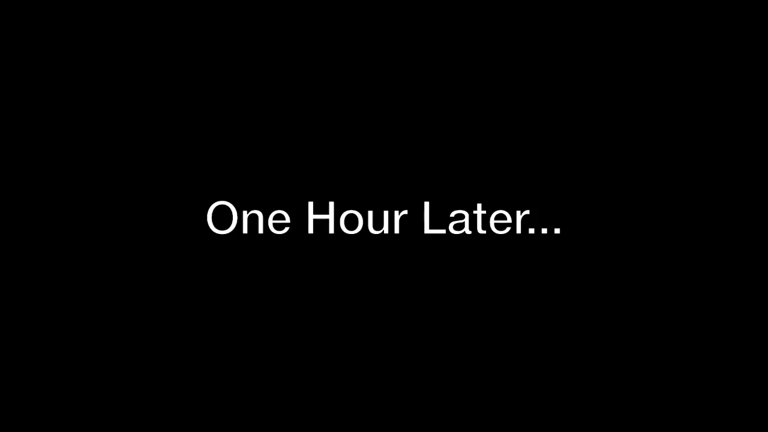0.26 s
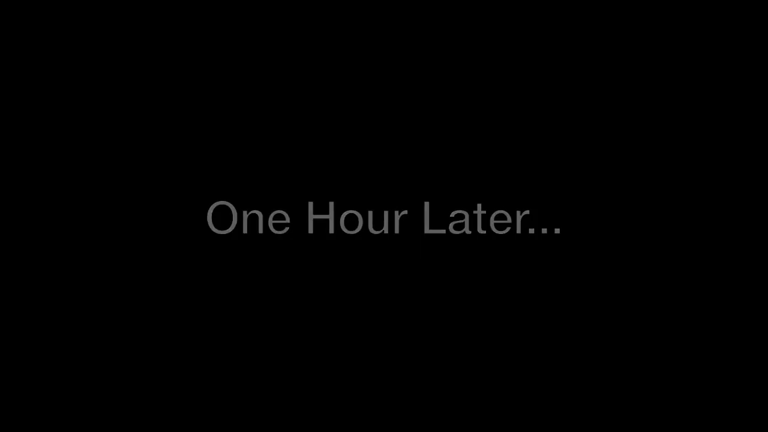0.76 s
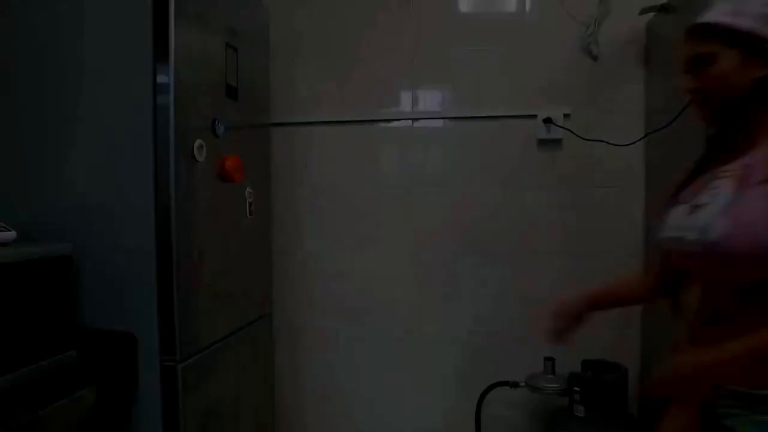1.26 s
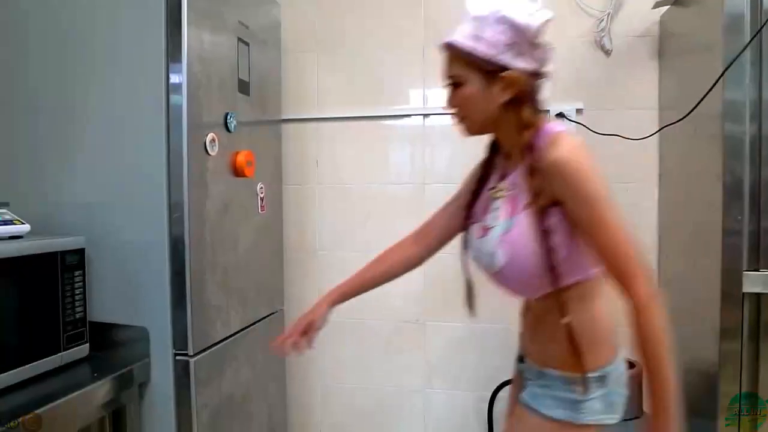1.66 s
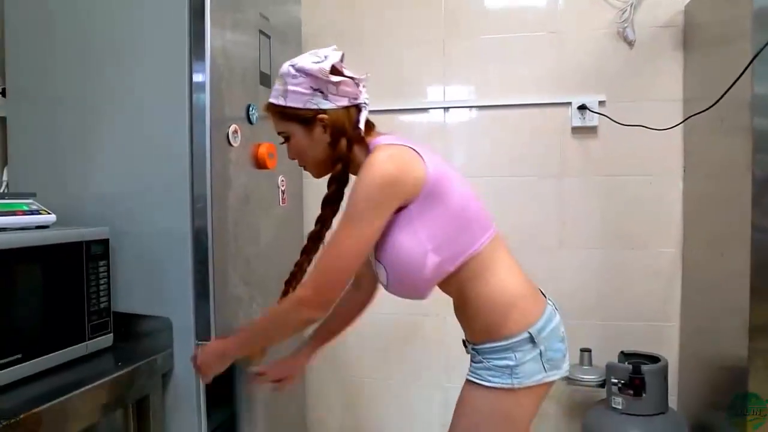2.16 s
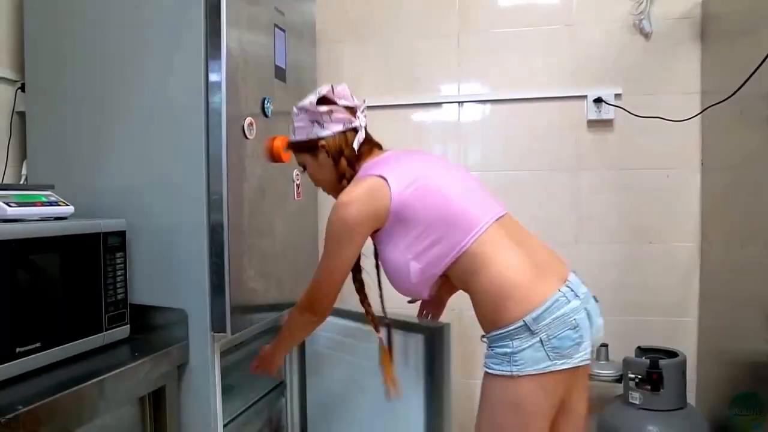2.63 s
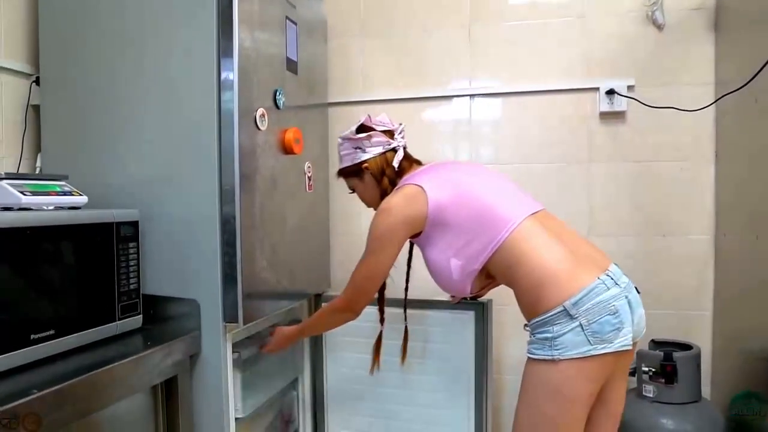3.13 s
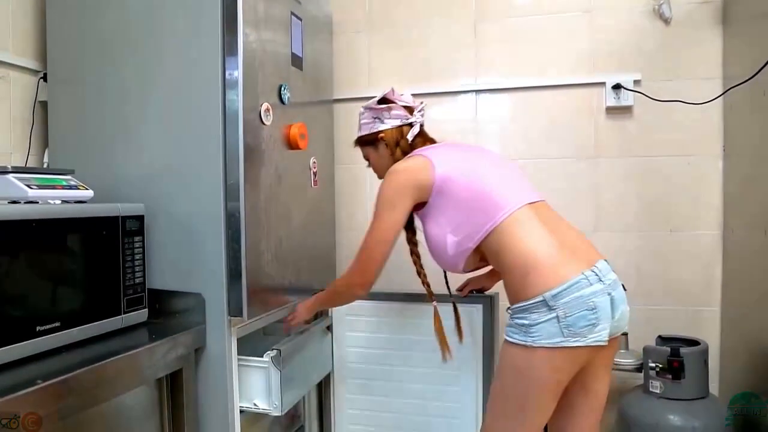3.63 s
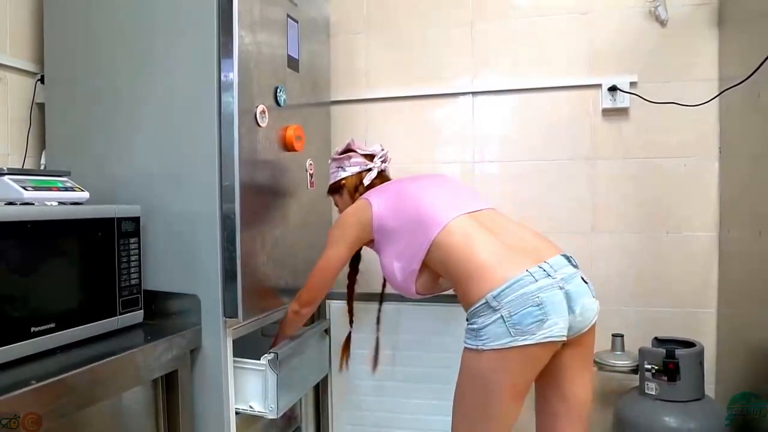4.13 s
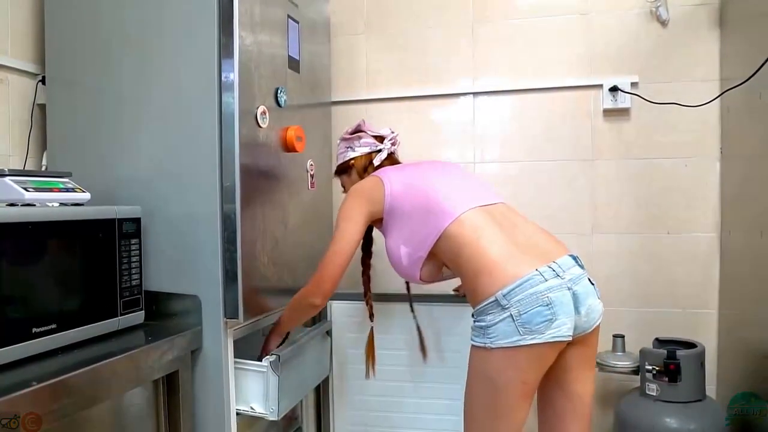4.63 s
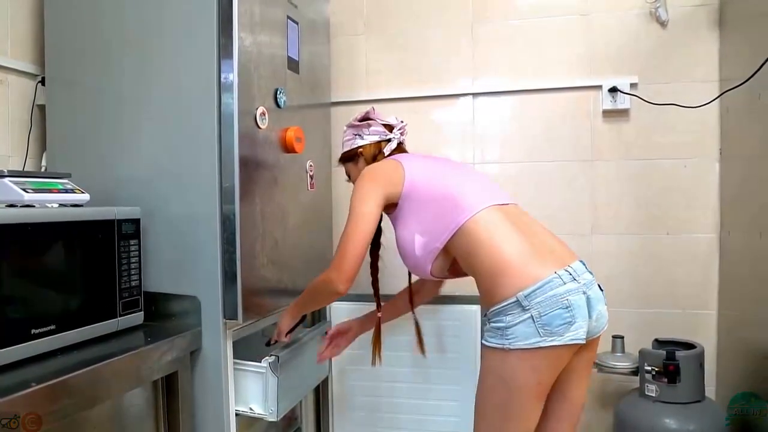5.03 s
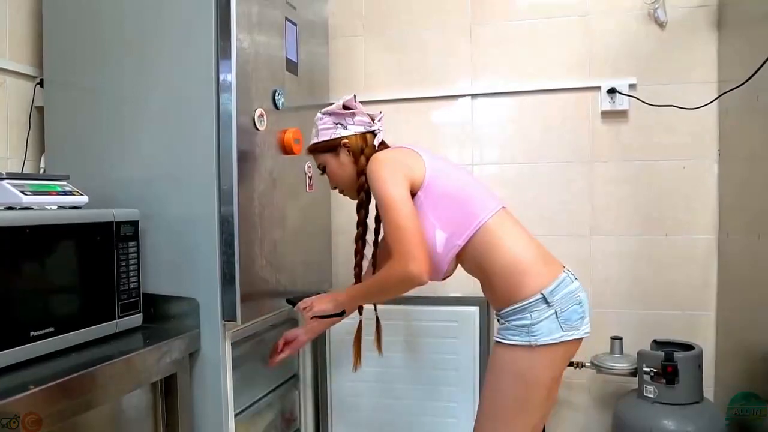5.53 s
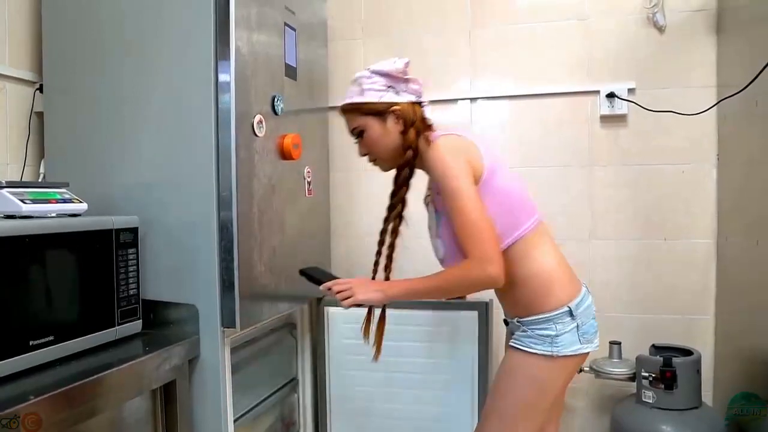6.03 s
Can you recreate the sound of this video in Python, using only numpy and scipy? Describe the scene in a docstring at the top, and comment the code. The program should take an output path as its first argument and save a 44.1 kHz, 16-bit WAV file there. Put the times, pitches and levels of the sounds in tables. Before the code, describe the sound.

A woman opens a freezer in a small, bright-echoing tiled kitchen. Silence first, then quiet hum fades up, scattered knocks, the door seal letting go with a deep boom, a hollow plastic drawer juddering out on its runners, a pause with rubbing and a few clunks, then a quicker, hissing scrape back in ending with a loud bump and one last knock. Close room microphone, swaying low rumble.

```python
"""A plastic drawer scrapes out on its runners and is later shoved back in: stick-slip friction excites its tray.
Knocks of freezer door, drawer and contents are noise bursts with decaying panel tones; brief narrow-band
scuffs, shaped-noise rubbing and decaying-sine thumps of the cabinet join them, with echoes from a tiled
kitchen on all but the thumps. Behind them a fridge hums as unsteady sines amid air noise, and a deep rumble
sways; this background alone fades in from silence."""
import sys
import numpy as np
from scipy import signal
from scipy.fft import rfft, irfft, next_fast_len
from scipy.io import wavfile
from scipy.ndimage import map_coordinates

SR = 44100
rng = np.random.default_rng(int(sys.argv[2]) if len(sys.argv) > 2 else 0)


def master_out(mix):
    """Clip the mix to full scale and print it as 16-bit PCM to the path in sys.argv[1]."""
    frames = np.transpose(np.atleast_2d(mix))
    ceiling = np.clip(frames, -1, 1)
    pcm = np.round(ceiling * 32767).astype(np.int16)
    wavfile.write(sys.argv[1], SR, pcm)


N = 277644


def amp(db):
    """Decibel law: amplitude ratio of a level."""
    return 10 ** (np.asarray(db) / 20)


def unit(x):
    """Effective value: x scaled to rms 1."""
    return x / np.sqrt(np.mean(x ** 2) + 1e-20)


def along(points, hz):
    """Logarithmic pitch: (f/Hz, value) points interpolated on a log frequency axis."""
    f, v = np.transpose(points)
    return np.interp(np.log(hz + 1), np.log(f + 1), v)


def wobble(rate, size=N):
    """Slow random modulation: a smooth curve through rate random knots a second."""
    knots = rng.standard_normal(int(size * rate / SR) + 4)
    return map_coordinates(knots, [np.arange(size) * rate / SR])


def filtered(x, response):
    """Linear filtering: the spectrum of x times a response of frequency."""
    m = next_fast_len(len(x) + SR // 2)
    hz = np.fft.rfftfreq(m, 1 / SR)
    return irfft(rfft(x, m) * response(hz), m)[:len(x)]


def coloured(x, spectrum):
    """Spectral shaping: x weighted by (f/Hz, level/dB) points, at rms 1."""
    return unit(filtered(x, lambda hz: amp(along(spectrum, hz))))


def band(x, low_hz, high_hz, order=3):
    """Band limitation: a causal Butterworth band-pass."""
    edges = [low_hz, min(high_hz, SR / 2 - 1)]
    return signal.sosfilt(signal.butter(order, edges, 'band', fs=SR, output='sos'), x)


def ringing(x, modes):
    """Modal superposition: x through a sum of resonances of alternating sign."""
    def response(f):
        total = 0
        for k, (centre, width, db) in enumerate(modes):
            resonance = 1j * f * width / (centre * centre - f * f + 1j * f * width)
            total = total + (-1) ** k * amp(db) * resonance
        return total
    return filtered(x, response)


def add(track, s, sound):
    """Superposition: mix a sound in at time s."""
    part = track[round(s * SR):][:len(sound)]
    part += sound[:len(part)]


def slips(rate, spread_db):
    """Dry friction: tiny random slips of uneven size, rate a second on average."""
    chance, size = rng.random(N), rng.standard_normal(N)
    sign = np.sign(rng.standard_normal(N))
    return unit((chance < rate / SR) * sign * amp(spread_db * np.clip(size, -2, 2)))


def envelope(start, length, attack, release_db_per_s, slope_db_per_s=0):
    """Exponential onset and decay: one movement rises, holds with a steady slope and dies away."""
    t = np.maximum(np.arange(N) / SR - start, 0)
    db = slope_db_per_s * np.minimum(t, length) - release_db_per_s * np.maximum(t - length, 0)
    return (1 - np.exp(-t / attack)) * amp(db)


# Reverberation time of the tiled room: (f/Hz, t60/s)
TILED_ROOM = [(100, 0.75), (400, 0.65), (1500, 0.6), (4500, 0.46), (8000, 0.4), (15000, 0.32)]


def room(x, wet_db):
    """Reverberation: x plus a fresh diffuse tail whose decay time depends on frequency."""
    hz, t, z = signal.stft(rng.standard_normal(SR * 3 // 4), SR, nperseg=256)
    decay = amp(-60 * t / along(TILED_ROOM, hz)[:, None]) * (1 - np.exp(-t / 0.0012))
    tail = signal.istft(z * decay, SR, nperseg=256)[1]
    return x + amp(wet_db) * signal.fftconvolve(x, tail / np.linalg.norm(tail))[:len(x)]


# Spectrum of the room air: (f/Hz, relative level/dB)
AIR_SPECTRUM = [(15, -28), (40, -0.5), (75, -24), (240, -24.5), (450, -18.5), (750, -26), (1200, -28.5),
                (2300, -33.5), (4500, -39), (5600, -42.5), (8000, -48), (14400, -50), (16000, -80)]
# Fridge hum lines: (f/Hz, rms level/dB before HUM_DB)
HUM_LINES = [(247.6, -56), (344.5, -42), (742.9, -54), (1098, -58), (1663, -61), (2089, -65)]
HUM_DB, AIR_DB, WHINE_DB = -1.5, -38.5, -58


def kitchen():
    """Stationary noise and line spectrum: air, the fridge's slightly unsteady hum, a thin whine."""
    t = np.arange(N) / SR
    air = amp(AIR_DB) * coloured(rng.standard_normal(N), AIR_SPECTRUM)
    hum = np.zeros(N)
    for hz, db in HUM_LINES:
        level = amp(db + 1.2 * wobble(4)) * np.sqrt(2)  # a sine's peak is root two times its rms
        phase = 2 * np.pi * hz * t + hz / 2500 * wobble(6)
        hum += level * np.sin(phase)
    whine = amp(WHINE_DB) * unit(band(rng.standard_normal(N), 4560, 4760, order=2))
    return air + amp(HUM_DB) * hum + whine


# Spectrum of the deep noise: (f/Hz, relative level/dB)
RUMBLE_SPECTRUM = [(20, 3), (32, -18.5), (50, -6.5), (70, -19), (140, -36), (400, -75)]
# Common level of sway and deep noise: (t/s, relative level/dB)
SWAY_LEVEL = [(1.0, -38), (1.13, -23), (1.44, -31.5), (1.51, -17.5), (2.28, -20), (2.44, -12),
              (4.02, -30.5), (4.26, -15), (4.36, -28.5), (4.69, -18), (5.7, -34.5), (5.85, -16),
              (6.22, -18), (6.3, -16.5)]


def rumble():
    """Frequency modulation: a nearly regular sway below hearing, with a little deep noise."""
    sway_hz = 12.2 * (1 + 0.1 * wobble(5))
    swing = np.sqrt(2) * np.sin(2 * np.pi * np.cumsum(sway_hz) / SR)
    deep = unit(band(coloured(rng.standard_normal(N), RUMBLE_SPECTRUM), 26.6, 190))
    level_db = np.interp(np.arange(N) / SR, *np.transpose(SWAY_LEVEL))
    return amp(level_db) * (amp(2.0) * swing + amp(-18.0) * deep)


# Hollow thumps of the cabinet: (t/s, level/dB, f/Hz, attack/s, t60/s)
CABINET_THUMPS = [(2.137, -4, 52.5, 0.027, 0.35), (2.379, -6.5, 236, 0.00056, 0.04),
                  (3.168, -13, 79, .005, 0.32), (5.595, 1, 130, 0.0029, 0.056)]


def cabinet():
    """Damped oscillation: the seal lets go and the drawer jolts, so the hollow cabinet booms."""
    out, t = np.zeros(N), np.arange(SR // 2) / SR
    for s, db, hz, attack, t60 in CABINET_THUMPS:
        decay = amp(db - 60 * t / t60) * (1 - np.exp(-t / attack))
        add(out, s, decay * np.sin(2 * np.pi * hz * t))
    return out


# Hands and door seal rubbing: (start t/s, length/s, relative rub level/dB, relative rustle level/dB)
RUB_TOUCHES = [(1.313, 0.62, -37.5, -39), (1.896, 0.68, -27, -41), (2.07, 0.024, -22.5, -26),
               (2.663, 0.28, -27, -37.5), (4.03, 0.24, -32.5, -37), (4.219, 0.36, -26.5, -36.5),
               (4.75, 0.039, -34.5, -52), (5.28, 0.19, -28.5, -28.5), (5.447, .04, -11, -21.5),
               (5.893, 0.31, -28, -38.5)]
# Spectra of the soft rub and the fine rustle: (f/Hz, relative level/dB)
RUB_SPECTRUM = [(50, -24), (100, 7), (250, -0.5), (600, -2.5), (1200, -2), (2200, -19), (4000, -38)]
RUSTLE_SPECTRUM = [(1060, -27), (1800, -1), (3350, -6.5), (4020, -7), (4700, -9.5), (9080, -20.5),
                   (13500, -20.5), (16000, -42)]
RUB_ATTACK_S, RUB_RELEASE_DB_PER_S = 0.03, 100


def handling():
    """Sliding friction: random slips make a soft rub with a fine rustle on top."""
    rub, rustle = np.zeros(N), np.zeros(N)
    for s, length, rub_db, rustle_db in RUB_TOUCHES:
        touch = envelope(s, length, RUB_ATTACK_S, RUB_RELEASE_DB_PER_S)
        rub += amp(rub_db) * touch
        rustle += amp(rustle_db) * touch
    low = amp(-7) * rub * coloured(slips(rate=900, spread_db=1), RUB_SPECTRUM)
    high = amp(-6.5) * rustle * coloured(slips(rate=2500, spread_db=-1.0), RUSTLE_SPECTRUM)
    return room(low + high, wet_db=-10.0)


# Groans and scuffs where rubber or plastic catches: (start t/s, length/s, f/Hz, width/Hz, level/dB)
CATCHES = [(1.923, 0.061, 613, 15, -27.5), (2.005, 0.096, 264, 50, -32), (3.11, 0.2, 514, 41, -17),
           (4.275, 0.055, 3950, 700, -32.5), (5.689, 0.083, 431, 19, -17.5)]


def scuffs():
    """Narrow-band resonance: a catching surface sings briefly."""
    out = np.zeros(N)
    for s, length, hz, width_hz, db in CATCHES:
        swell = signal.windows.tukey(round(length * SR), 0.6)
        song = band(rng.standard_normal(SR), hz - width_hz / 2, hz + width_hz / 2, order=1)
        settled = unit(song[-len(swell):])  # the end, where the resonance has built up
        add(out, s, amp(db) * settled * swell)
    return room(out, wet_db=-7.5)


# Resonances of the drawer's tray: (f/Hz, width/Hz, level/dB)
TRAY_MODES = [(195, 49, -3), (242.8, 11, 2.5), (318, 45, -4.5), (398.4, 30, -1), (528, 5.3, -1),
              (628, 160, -13), (798, 28, -5), (920, 49, -4), (1140, 18, -3), (1282, 91, -5.5),
              (1995, 165, -10.5)]


def tray(x):
    """Forced vibration: the drawer's tray answers a force x in its own modes."""
    return ringing(x, TRAY_MODES)


# Knocks of door, drawer and contents:
# (t/s, relative strength level/dB, brightness/dB per octave, ring f/Hz, room level/dB)
KNOCK_EVENTS = [(0.906, -41.5, -0.5, 332, -6), (0.949, -31.5, -2, 2385, 0), (1.318, -32.5, -3, 575, 0),
                (1.348, -31.5, 1.5, 596, 0), (1.391, -16.5, 0.5, 2605, -3), (1.706, -22.5, -2, 312, -5.5),
                (1.748, -25, 0, 298, -2), (1.788, -15, -0.3, 763, -5.5), (1.912, -29, 2.8, 570, -0.5),
                (2.07, -37, 7.5, 560, -12), (2.11, -16.5, -0.7, 3340, -8), (2.255, -31.5, 2.5, 316, -9),
                (2.36, -27, 1.2, 3570, -7.5), (2.379, -19.5, -1.5, 420, -2.5), (2.806, -20, 1.5, 361, -3.5),
                (2.843, -23, 5.5, 661, -6.5), (2.963, -17.5, 0, 1320, -4.5), (3.07, -23.5, 4, 654, -6),
                (3.086, -18.5, 5.5, 476, -4), (3.116, -15, -1, 520, -6.5), (3.214, -17.5, 3, 510, -1),
                (3.268, -15, 3.2, 633, -3.5), (3.332, -14, -1.2, 427, -2), (3.454, -12, 3.1, 1230, -9),
                (4.394, -16.5, 0.5, 1300, -11), (4.41, -19.5, -2.5, 393, -3.5),
                (4.528, -16.5, -1.1, 396.4, -3), (4.571, -26.5, 1.8, 428, -5.5), (4.772, -39, 1, 311, 0),
                (5.219, -27.5, 1.7, 406, 0), (5.467, -15, 1, 404, 2), (5.509, -17.5, 5, 2100, -7),
                (5.574, -17, 3, 541, -12), (5.6, -10.5, 1, 435, -11.5), (6.104, -17.5, -1, 376.6, -8.5)]
# How each part of a knock swells and dies: (low f/Hz, high f/Hz, attack/s, t60/s, relative level/dB)
KNOCK_PARTS = [(171, 600, 0.0017, 0.12, -9.5), (648, 1600, 0.001, 0.079, -5),
               (1730, 4230, 0.00047, 0.07, -12), (4400, 6320, 0.0015, 0.049, -21),
               (7250, 14200, 0.00052, 0.045, -30.5)]
PIVOT_HZ = 1000  # brightness tilts a knock about this frequency
FOCUS_DB, FOCUS_OCTAVES = 6.5, 0.77  # lift of the parts nearest to the ring
RING_DB, RING_DB_PER_OCTAVE = -3.5, -4  # against the strength; higher rings are weaker
GRAIN_DB, GRAIN_RATE = 2, 701  # random graininess of each noise burst: depth in dB, changes a second
DOOR_OPEN_S = 2.9  # from here every knock lands on the drawer and rings its tray
TRAY_DB, CONTACT_S = -3.5, 0.00057


def knocks():
    """Impact excitation: each contact is a dense noise burst with a pair of damped panel tones."""
    out, t = np.zeros(N), np.arange(SR * 3 // 4) / SR
    contact_force = np.sin(np.pi * np.minimum(t / CONTACT_S, 1)) ** 2
    tray_ring = tray(contact_force)
    tray_ring = amp(TRAY_DB) * tray_ring / np.std(tray_ring[:SR // 50])
    for s, strength_db, brightness, ring_hz, room_db in KNOCK_EVENTS:
        phase = 2 * np.pi * ring_hz * t
        panel = np.sin(phase) + amp(-10.5) * np.sin(1.55 * phase)
        ring_db = RING_DB + RING_DB_PER_OCTAVE * np.log2(ring_hz / PIVOT_HZ)
        blow = amp(ring_db - 60 * t / 0.14) * panel * (1 - np.exp(-t / 0.00066))
        grain = amp(GRAIN_DB * wobble(GRAIN_RATE, size=len(t)))
        for low_hz, high_hz, attack, t60, db in KNOCK_PARTS:
            centre_hz = np.sqrt(low_hz * high_hz)
            tilt_db = brightness * np.log2(centre_hz / PIVOT_HZ)
            octaves_off = np.log2(centre_hz / ring_hz)
            focus_db = FOCUS_DB * np.exp(-(octaves_off / FOCUS_OCTAVES) ** 2)
            shape = grain * (1 - np.exp(-t / attack)) * amp(-60 * t / t60)
            burst = band(rng.standard_normal(len(t)) * shape, low_hz, high_hz)
            blow += amp(db + tilt_db + focus_db) * burst / np.std(burst[:SR // 50])
        if s > DOOR_OPEN_S:
            blow += tray_ring
        add(out, s, room(amp(strength_db) * blow, room_db))
    return out


# Spectra of the scrape and of the frost hiss: (f/Hz, relative level/dB)
SCRAPE_SPECTRUM = [(29, -42), (50, -9), (112, -4), (150, -9), (187, 0), (296, -12), (404, 1), (573, -5.5),
                   (1310, -9), (1750, -21.5), (4000, -34), (5200, -56), (8800, -120)]
HISS_SPECTRUM = [(1200, -19), (2200, 10.5), (3500, 4.5), (4800, -2.5), (6500, -7.5), (8500, -21),
                 (12700, -17.5), (16000, -32)]
# Drawer sliding out and back in: (start t/s, length of the drive/s, time to gather speed/s,
# change of the hiss level/dB per s)
PULL_STROKE = (3.083, 0.59, 0.15, 8.7)
PUSH_STROKE = (5.5, 0.32, 0.1, -9)
# let go, the drawer coasts to rest; judder and hiss start almost at once, and the judder eases
COAST_DB_PER_S, BREAKAWAY_S, JUDDER_EASE_DB_PER_S = 90.5, 0.01, 4.5


def drawer(stroke, ring_db, scrape_db, judder_db, hiss_db, rattle_db):
    """Stick-slip on the runners: the tray rings, judders and rattles, frost hisses along the rails."""
    start, length, attack, hiss_db_per_s = stroke
    scrape = envelope(start, length, attack, COAST_DB_PER_S)
    hiss = envelope(start, length, BREAKAWAY_S, COAST_DB_PER_S, hiss_db_per_s)
    judder = envelope(start, length, BREAKAWAY_S, COAST_DB_PER_S, -JUDDER_EASE_DB_PER_S)
    chatter = amp(1.2 * wobble(80))
    ring = unit(band(tray(slips(rate=2000, spread_db=1.5) * chatter), 151, 1730))
    # the tray's resonances drift as its support on the runners shifts
    ring = np.interp(np.cumsum(1 + 0.025 * wobble(5)), np.arange(N), ring)
    grind = coloured(slips(rate=1200, spread_db=3) * chatter, SCRAPE_SPECTRUM)
    grind = unit(band(grind, 276, 3200))
    shake = unit(band(coloured(rng.standard_normal(N), SCRAPE_SPECTRUM), 73, 300))
    frost = coloured(rng.standard_normal(N) * chatter, HISS_SPECTRUM)
    # loose plastic chatters in short, uneven bursts
    taps = np.abs(slips(rate=60, spread_db=2))
    tap_decay = amp(-60 * np.arange(SR // 10) / SR / 0.059)
    bursts = signal.fftconvolve(taps, tap_decay)[:N]
    rattle = unit(band(bursts * rng.standard_normal(N), 730, 2920, order=2))
    # the rattle follows the stroke squared: it is heard only at speed
    body = scrape * (amp(ring_db) * ring + amp(scrape_db) * grind + amp(rattle_db) * scrape * rattle)
    low_shake = judder * amp(judder_db) * shake
    return room(body + low_shake + hiss * amp(hiss_db) * frost, wet_db=-9.0)


# Fade-in of the background: (t/s, level/dB)
FADE_IN = [(0, -110), (.6, -70), (.7, -35), (.8, -22), (.9, -10), (1.0, 0)]


def scene():
    """Superposition of sources: door, drawer and hands over the steady sound of the kitchen."""
    fade_in = amp(np.interp(np.arange(N) / SR, *np.transpose(FADE_IN)))
    background = fade_in * (kitchen() + rumble())
    pull = drawer(PULL_STROKE, ring_db=-18.5, scrape_db=-16.0, judder_db=-19.5, hiss_db=-33.5, rattle_db=-24)
    push = drawer(PUSH_STROKE, ring_db=-17, scrape_db=-14.5, judder_db=-21.0, hiss_db=-25.0, rattle_db=-25.5)
    return (background + cabinet() + handling() + scuffs() + knocks() + pull + push)[None]


TOP_HZ = 15800


def record(dry):
    """Saturation and band limitation: peaks flatten towards full scale, then a sharp cut at TOP_HZ."""
    clipped = dry[0] / (1 + np.abs(dry[0]) ** 8) ** (1 / 8)
    return filtered(clipped, lambda hz: hz < TOP_HZ)[None]


dry = scene()
out = record(dry)
master_out(out)
```